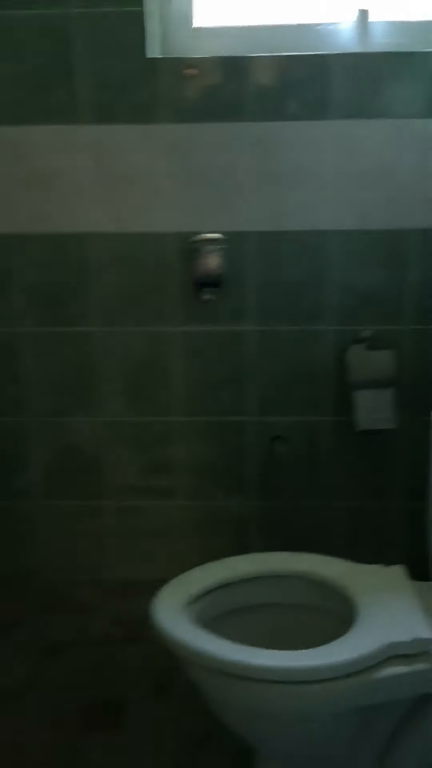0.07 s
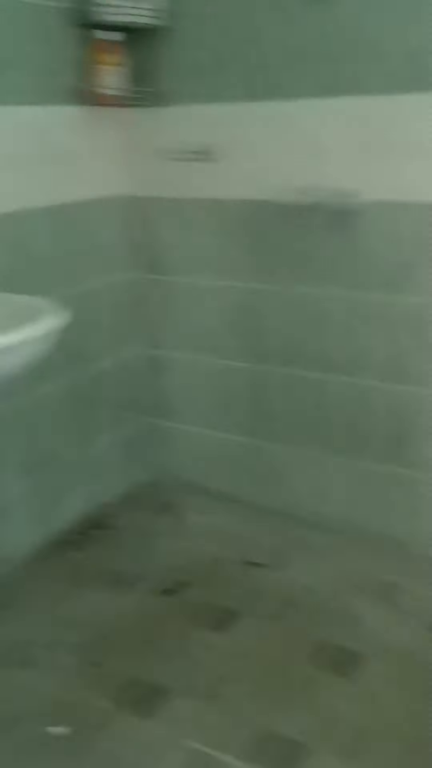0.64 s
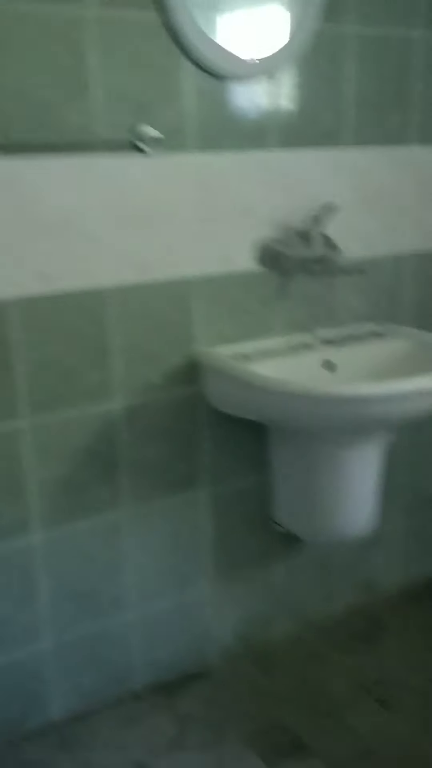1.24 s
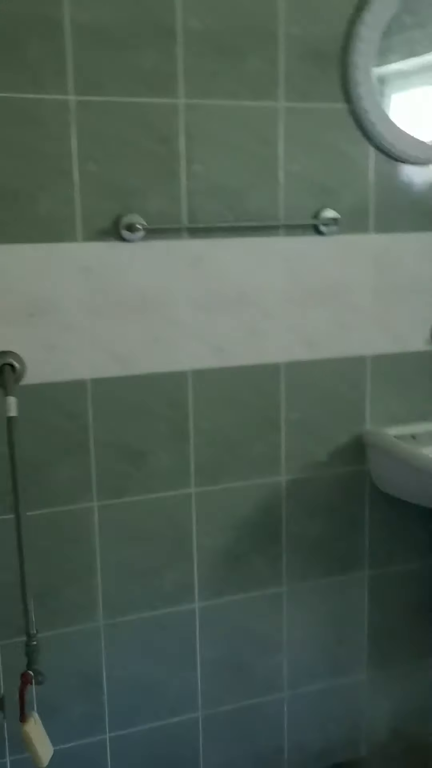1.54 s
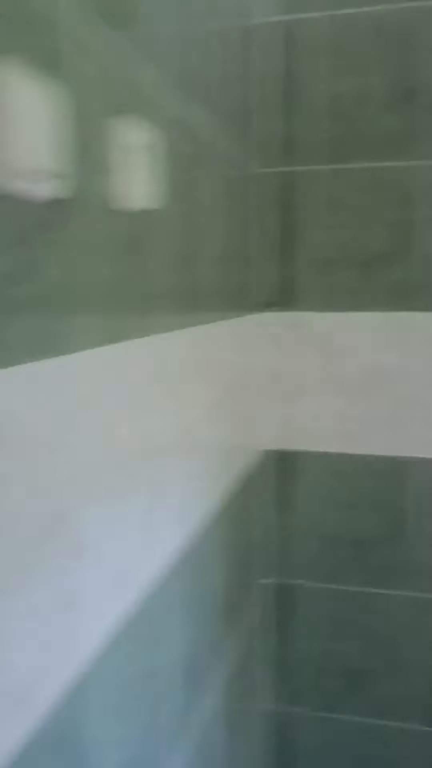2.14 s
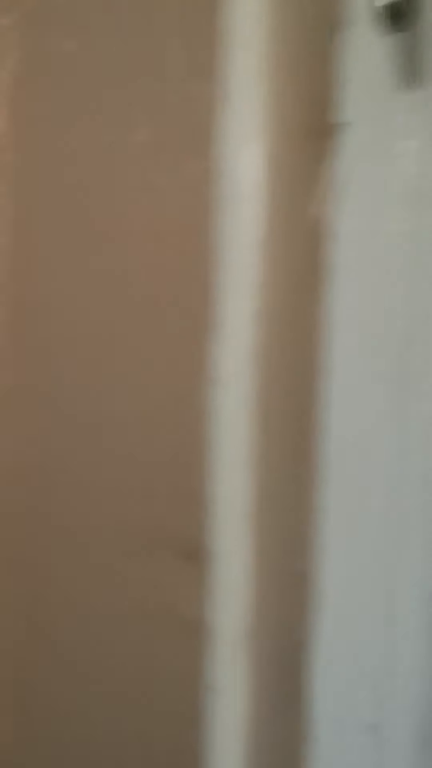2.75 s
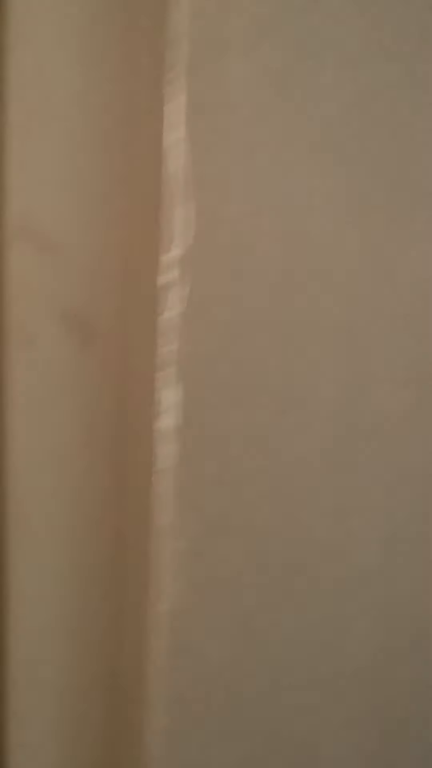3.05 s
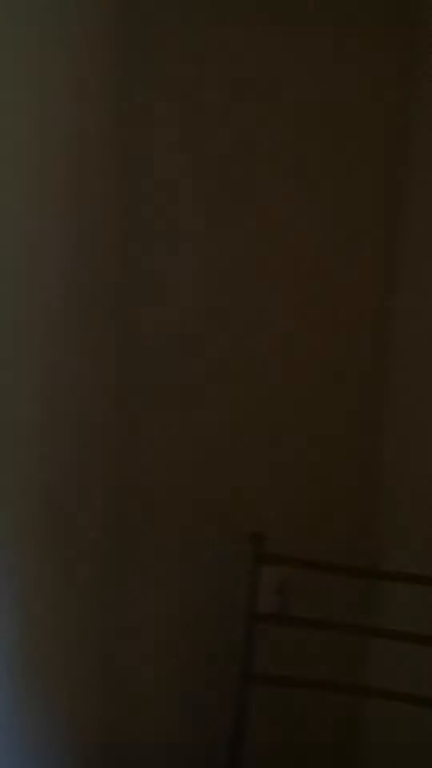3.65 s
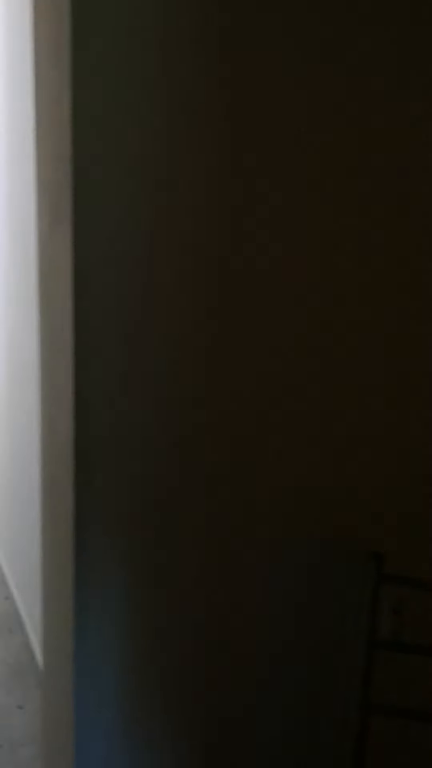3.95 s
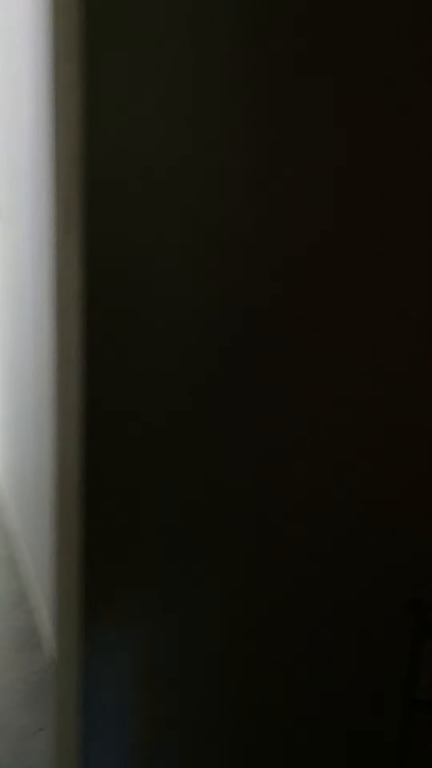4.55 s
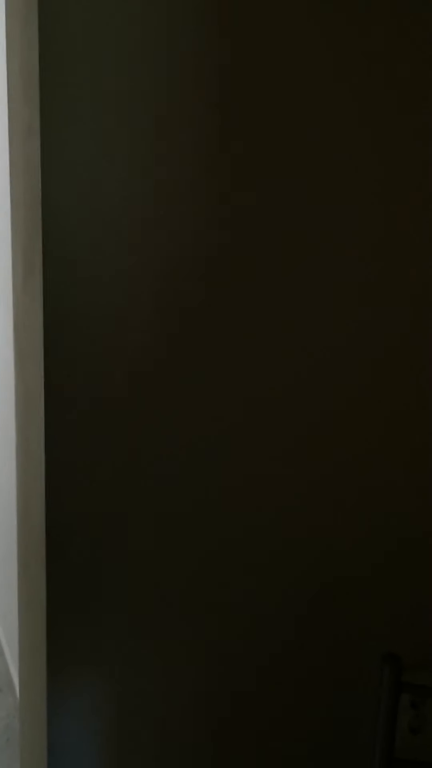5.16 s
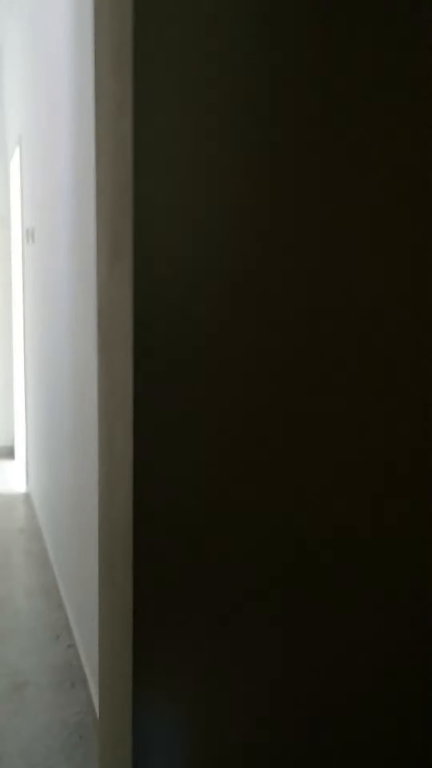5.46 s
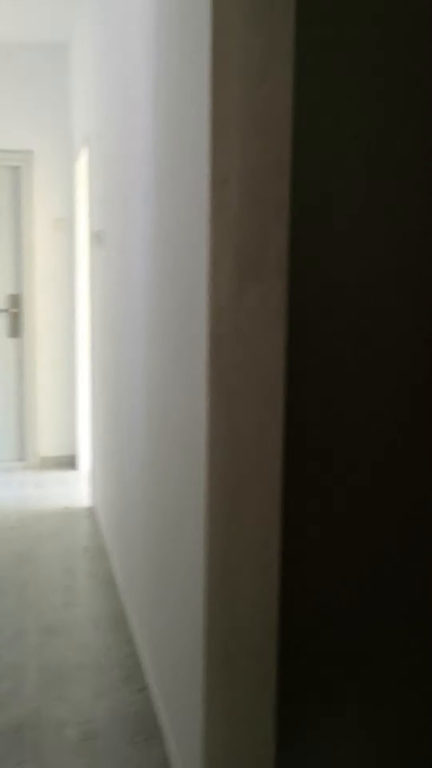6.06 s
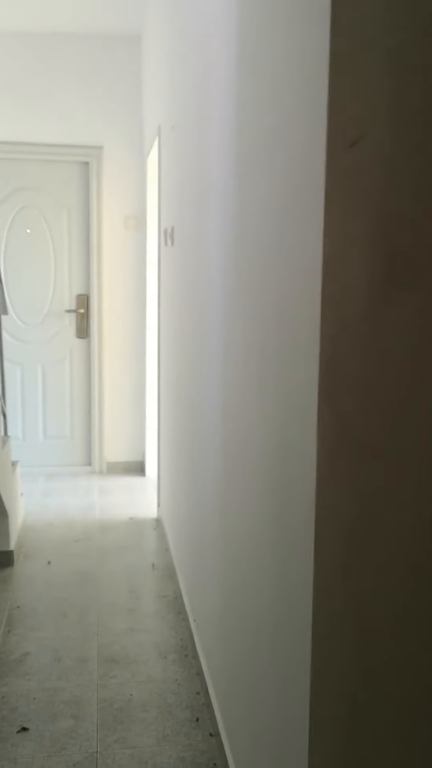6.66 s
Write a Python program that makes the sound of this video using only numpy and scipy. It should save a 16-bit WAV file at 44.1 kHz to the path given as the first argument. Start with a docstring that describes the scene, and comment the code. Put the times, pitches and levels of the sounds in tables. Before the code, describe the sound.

Shoes scuff, scrape and step unevenly over dusty tiles, with a bright echo from bare walls and a faint hush of air.

```python
"""Shuffling footsteps, close to a stereo microphone that the walker carries out of a tiled washroom
and into the corridor of an empty building. Soles grind dust and grit on the tiles, heels and toes
knock, and the weight of each step sets the rooms booming. The bare walls give a bright, dense echo,
distant rooms answer faintly, and behind it all lies the hush of still air."""
import sys
import numpy as np
from scipy import signal
from scipy.fft import rfft, irfft, next_fast_len
from scipy.io import wavfile
from scipy.ndimage import uniform_filter1d

SR = 44100
rng = np.random.default_rng(int(sys.argv[2]) if len(sys.argv) > 2 else 0)


def inscribe(sig):
    """Save sig as 16-bit PCM at rate SR to the path in sys.argv[1].

    A 1-D sig is mono; a 2-D sig holds one channel per row.
    Samples are clipped to [-1, 1] before scaling.
    """
    pcm = np.round(np.clip(np.atleast_2d(sig).T, -1, 1) * 32767)
    wavfile.write(sys.argv[1], SR, pcm.astype(np.int16))


N = 300746

# Still air in the building. Each row: frequency in Hz, relative level in dB.
AIR_SPECTRUM = [(20, 5.5), (45, -2.5), (100, -12), (150, -13.5), (300, -20), (550, -26), (1000, -25.5),
                (2000, -22), (4000, -31), (7500, -31.5), (11000, -40.5), (15000, -38)]
# Echo off the nearby walls. Each row: frequency in Hz, t60 in seconds.
WALL_DECAY = [(100, 0.74), (260, 0.33), (700, 0.52), (1900, 0.47), (4800, 0.44), (8000, 0.35),
              (14000, 0.15)]
# Standing waves between the walls. Each row: pitch in Hz, gain near the washroom in dB,
# gain in the corridor in dB, t60 in seconds.
ROOM_MODES = [(68.9, 1.5, -35, 0.79), (114.7, -8, 3.5, 0.87), (141.4, 0.5, 1, 0.17),
              (185, -3.5, -0.5, 0.79), (204, -6, -2.5, 1), (287, -9.5, -5.5, 1), (388, 0, -1, 0.49)]
# How alike the microphone's two ports hear a room. Each row: frequency in Hz, correlation.
PORT_LIKENESS = [(60, 0.98), (140, 0.92), (290, 0.42), (600, -0.8), (1200, 0.15), (15000, -0.11)]
# The right port hears more of the treble. Each row: frequency in Hz, right minus left in dB.
PORT_BALANCE = [(300, 0), (700, 2), (1400, 1.5), (2200, 1.5), (3200, -1), (5500, 2), (7500, -5),
                (9800, 9.5), (15000, -0.5)]
# The microphone turns against the walls. Each row: time in seconds, right minus left in dB.
MIC_TURN = [(0.351, 2.5), (.75, 0.5), (1.65, 3.5), (2.2, 0.5), (3, 1.5), (4.1, 2.2), (4.55, 2),
            (5.402, 3.5), (6.6, 2)]
# Weight shifts onto a foot. Each row: start in seconds, level in dB, pitch in Hz, t60 in seconds.
WEIGHT_SHIFTS = [(.7, -34.5, 103, 0.088), (1.484, -44, 130, 0.34), (1.847, -35.5, 186, 0.21),
                 (2.149, -35, 115, 0.054), (3.041, -53, 134, 0.22), (4.011, -53.5, 174, .25),
                 (4.089, -36, 118, .09), (4.28, -50.5, 207, .16), (4.385, -49.5, 175, 0.05),
                 (4.548, -59, 173, 0.33), (5.259, -39.5, 141, 0.31), (5.322, -29.5, 140, 0.46),
                 (5.475, -35, 144, .2), (6.386, -58.5, 252, 0.2), (6.539, -44, 211, 0.39)]
# Heel, toe or sole edge knocks, and the sharp cracks of grit grains under a landing sole (the two rows near 0.7
# s). Each row: start in seconds, level in dB, pitch in Hz, width in octaves.
SHOE_KNOCKS = [(.701, -31.5, 4160, 1), (.7124, -29, 5700, 0.67), (1.661, -31.5, 1960, 0.36),
               (1.739, -32, 1970, 3.1), (1.844, -27.5, 374, 0.47), (1.85, -33.5, 1010, 1.32),
               (2.138, -36.5, 1890, 0.85), (2.56, -53, 280, 1.1), (3.029, -42, 3600, 0.42),
               (3.472, -50.5, 1560, 0.52), (4.05, -37, 2980, 0.31), (4.089, -33, 680, 3.06),
               (4.096, -36, 2150, 0.35), (4.402, -50.5, 290, .5), (4.547, -29.5, 2730, 0.27),
               (5.262, -40, 1240, 0.81), (5.487, -39.5, 840, 0.96), (6.385, -45.5, 800, 0.58),
               (6.538, -31.5, 1650, 0.67), (6.54, -35.5, 431, 1.03), (6.578, -33.5, 1450, 0.82),
               (6.661, -40, 1620, 0.63)]
# The rasp of grit under a sole. Each row: frequency in Hz, relative level in dB.
GRIT_SPECTRUM = [(100, -9), (300, -25), (550, -27.5), (950, -15.5), (1300, -14.5), (1900, -4), (2500, -2),
                 (4000, -6), (5600, -1), (7500, 0.5), (9200, -4), (11500, -16.5), (15000, -17)]
# A sole is set down on grit. Each row: start in seconds, contact in seconds, level in dB,
# brightness in dB per octave.
SOLE_LANDINGS = [(0.0, 0.0014, -59.5, -12.5), (.254, 0.032, -43.5, -0.1), (0.696, 0.014, -35, -1),
                 (1.346, 0.011, -62.5, 7), (1.468, 0.058, -41, -2.5), (2.136, 0.031, -28.5, -1.5),
                 (2.769, 0.016, -44, 0.5), (3, 0.029, -50.5, -4), (3.379, 0.0035, -65, -12),
                 (3.471, .007, -59, -3), (3.707, 0.043, -56, .5), (4.01, 0.006, -47.5, 2),
                 (4.546, 0.0021, -34.5, -0.1), (5.136, 0.011, -60.5, -7), (5.257, 0.0061, -42.5, -2.5),
                 (5.482, 0.017, -41, 2), (5.72, 0.024, -58, -1.5), (6.382, 0.012, -43.5, 2)]
# A sole drags or twists over grit. Each row: start in seconds, length in seconds, level in dB,
# brightness in dB per octave.
SOLE_DRAGS = [(0.282, 0.1, -38.5, -1.5), (0.756, 0.039, -47, -2), (1.457, 0.21, -34.5, -4),
              (1.629, .12, -33.5, -2), (1.751, 0.13, -45, -3.5), (1.918, 0.062, -37, -0.5),
              (4.013, 0.057, -37.5, 1.4), (4.25, 0.12, -53, -5), (4.33, .042, -38.5, 6.5),
              (5.735, 0.3, -72, -8.5), (6.083, 0.18, -70, -19), (6.525, 0.18, -49.5, 3.5)]


def amp(db):
    """Decibels to gain."""
    return 10 ** (np.asarray(db) / 20)


def unit_rms(x):
    """Scales to rms 1."""
    return x / np.sqrt(np.mean(x ** 2) + 1e-20)


def curve_at(points, hz):
    """Reads a spectrum along a log-frequency axis."""
    freqs, values = np.transpose(points)
    return np.interp(np.log(hz + 1), np.log(freqs), values)


def add(mix, start_s, sound):
    """Lays a sound into the mix."""
    part = mix[max(round(start_s * SR), 0):][:len(sound)]
    part += sound[:len(part)]


def colour(x, db_at, size=4096):
    """Minimum-phase filter with the gain db_at(Hz)."""
    hz = abs(np.fft.fftfreq(size, 1 / SR))
    log_gain = np.log(amp(np.maximum(db_at(hz), -90)))
    taps = np.fft.ifft(np.exp(np.conj(signal.hilbert(log_gain)))).real
    return signal.fftconvolve(x, taps[:size // 2])[:len(x)]


def resonance_db(hz, centre_hz, octaves):
    """A broad hump with steep skirts."""
    return -32 * np.log10(1 + (np.log2((hz + 1) / centre_hz) / octaves) ** 2)


def stroke(swell_s, t60, slide_s=0):
    """Pressure that builds up, holds while the sole slides, and dies away."""
    t = np.arange(int((swell_s + slide_s + t60) * SR) + 2048) / SR
    rise = np.minimum(t / max(swell_s, 1 / SR), 1)
    return rise * amp(-60 * np.maximum(t - swell_s - slide_s, 0) / t60)


def at_level(sound, pressure, db):
    """Gives a sound the energy of its stroke, scaled by db."""
    return amp(db) * sound * np.linalg.norm(pressure) / np.linalg.norm(sound)


def impact(pressure, spike, centre_hz, octaves):
    """A sharp first contact and a noisy chatter ring one broad resonance."""
    chatter = pressure * rng.standard_normal(2 * SR)[:len(pressure)]
    chatter[0] += spike
    return colour(chatter, lambda hz: resonance_db(hz, centre_hz, octaves))


def at_ports(pair):
    """Two unrelated signals become alike in the bass, as at two close microphone ports."""
    first, second = rfft(pair)
    likeness = curve_at(PORT_LIKENESS, np.fft.rfftfreq(pair.shape[1], 1 / SR))
    mid = first * np.sqrt((1 + likeness) / 2)
    side = second * np.sqrt((1 - likeness) / 2)
    return irfft(np.array([mid + side, mid - side]), pair.shape[1])


def still_air(level_db=-63, drift_db=-1.2):
    """Room tone of the empty building: faint, slowly drifting rumble and hiss."""
    n = next_fast_len(N, True)
    spectrum = amp(curve_at(AIR_SPECTRUM, np.fft.rfftfreq(n, 1 / SR)))
    air = irfft(rfft(rng.standard_normal((2, n))) * spectrum, n)
    drift = unit_rms(uniform_filter1d(rng.standard_normal(N), size=16000))
    return amp(level_db) * unit_rms(at_ports(air)[:, :N]) * amp(drift_db * drift)


def wall_echo(x, gap_s=0.0025, far_db=-20.0, far_stretch=2.47):
    """Dense reflections, each band dying at its own speed; distant rooms ring fainter and longer."""
    reflections = rng.choice([-1., 1.], (2, SR)) * (rng.random((2, SR)) < 0.08)
    reflections *= np.arange(SR) / SR > gap_s
    hz, t, bands = signal.stft(at_ports(reflections), SR, nperseg=256)
    fall_db = -60 * t / curve_at(WALL_DECAY, hz)[:, None]
    near, far = amp(fall_db), amp(far_db + fall_db / far_stretch)
    tail = signal.istft(bands * np.hypot(near, far), SR, nperseg=256)[1]
    return signal.fftconvolve(x[None], tail / np.linalg.norm(tail[0]), axes=1)[:, :N]


def moving_echo(x, patterns=4, crossfade_samples=380):
    """A moving shoe meets another pattern of echoes every few milliseconds."""
    place = np.arange(N) / crossfade_samples
    offsets = [(place - k + patterns / 2) % patterns - patterns / 2 for k in range(patterns)]
    return sum(wall_echo(x * np.cos(np.pi / 2 * np.clip(offset, -1, 1))) for offset in offsets)


def direct_path(x, lag_samples=25):
    """The straight path from the shoe reaches the right port first."""
    return np.array([np.pad(x, (lag_samples, 0))[:N], x])


def treads(ball_after_s=0.1, ball_db=-9.5, swell_share=0.047):
    """Every footfall presses twice: the heel, then more softly the ball of the foot."""
    for start_s, db, centre_hz, t60 in WEIGHT_SHIFTS:
        pressure = stroke(swell_share * t60, t60)
        yield start_s, pressure, db, centre_hz
        yield start_s + ball_after_s, pressure, db + ball_db, centre_hz


def room_boom(corridor_from_s=4.9, reach_octaves=0.79, detune=0.011, stride=10):
    """The energy of each footfall piles up in the standing waves near its pitch and leaks away."""
    rate = SR // stride  # deep waves need few samples
    t, out = np.arange(rate) / rate, np.zeros(N)
    for start_s, pressure, db, centre_hz in treads():
        power = np.pad(pressure ** 2, (0, SR))[::stride][:rate]
        ring = np.zeros(rate)
        for hz, washroom_db, corridor_db, t60 in ROOM_MODES:
            mode_db = washroom_db if start_s < corridor_from_s else corridor_db
            retained = amp(-120 / (t60 * rate))  # share of the energy left after one sample
            height = np.sqrt(signal.lfilter([1 - retained], [1, -retained], power))
            pitch_hz = hz * (1 + detune * rng.uniform(-0.86, 1))
            wave = np.sin(2 * np.pi * (pitch_hz * t + rng.random()))
            ring += amp(db + mode_db + resonance_db(hz, centre_hz, reach_octaves)) * height * wave
        add(out, start_s, signal.resample_poly(ring, stride, 1))
    return out


def floor_thuds():
    """A dull push on the floor below the microphone, then a rumble as the foot rolls."""
    out = np.zeros(N)
    for start_s, pressure, db, centre_hz in treads():
        thud = impact(pressure, spike=25.4, centre_hz=centre_hz, octaves=0.9)
        add(out, start_s, at_level(thud, pressure, db))
    return out


def shoe_knocks():
    """The part of the shoe that strikes the tiles rings briefly; a few grains of grit crack sharply the same
    way."""
    out = np.zeros(N)
    for start_s, db, centre_hz, octaves in SHOE_KNOCKS:
        t60 = 0.06 * (1000 / centre_hz) ** 0.18 / octaves ** 0.15  # higher and wider knocks die sooner
        pressure = stroke(0, t60)
        knock = impact(pressure, spike=5.0, centre_hz=centre_hz, octaves=octaves)
        add(out, start_s, at_level(knock, pressure, db))
    return out


def sole_rubs():
    """A landing sole bites fast and settles; a dragged one swells and lifts off."""
    for start_s, span_s, db, tilt in SOLE_LANDINGS:
        yield start_s, stroke(swell_s=0.44 * span_s, t60=0.32, slide_s=0.56 * span_s), db, tilt
    for start_s, span_s, db, tilt in SOLE_DRAGS:
        yield start_s, stroke(swell_s=0.83 * span_s, t60=1.45 * span_s, slide_s=0.17 * span_s), db, tilt


def grit_scuffs(grains_per_s=1800, spread_db=2.5, dust_gain=0.38, catch_db=4.0):
    """Grains of grit crack over a fine hiss of dust, while the sole catches and slides."""
    grains = amp(spread_db * np.minimum(rng.exponential(1, N), 4)) * rng.choice([-1, 1], N)
    cracks = unit_rms(grains * (rng.random(N) < grains_per_s / SR))
    catch = amp(catch_db * unit_rms(uniform_filter1d(rng.standard_normal(N), size=300)))
    friction = (cracks + dust_gain * rng.standard_normal(N)) * catch
    out = np.zeros(N)
    for start_s, pressure, db, tilt in sole_rubs():
        rub = pressure * np.roll(friction, -round(start_s * SR))[:len(pressure)]
        rasp = colour(rub, lambda hz: curve_at(GRIT_SPECTRUM, hz)
                      + tilt * np.log2(np.maximum(hz, 700) / 4000))
        # the lighter the contact, the higher its lowest pitch
        lowest_hz = min(523 * 2 ** (0.23 * (-45.5 - db)), SR / 10)
        rasp = signal.lfilter(*signal.butter(2, lowest_hz, "high", fs=SR), rasp)
        add(out, start_s, at_level(rasp, pressure, db))
    return out


def scene():
    """Shoes heard from carrying height in the echoing rooms, over still air."""
    contacts = grit_scuffs() + shoe_knocks()
    thuds = floor_thuds()
    shoes = amp(-2.0) * moving_echo(contacts) + amp(-7.5) * direct_path(contacts)
    lean_db = np.interp(np.arange(N) / SR, *np.transpose(MIC_TURN)) / 2
    bass = amp(-5.5) * wall_echo(thuds) + amp(-11.0) * thuds + amp(-2.0) * room_boom()
    return shoes * amp([-lean_db, lean_db]) + bass + still_air()


def record(dry, edge_hz=15400):
    """Each microphone port has its own colour, and the highest treble is cut off."""
    n = next_fast_len(N, True)
    lean_db = curve_at(PORT_BALANCE, np.fft.rfftfreq(n, 1 / SR)) / 2
    heard = irfft(rfft(dry, n) * amp([-lean_db, lean_db]), n)[:, :N]
    lowpass = signal.firwin(511, edge_hz, window=("kaiser", 9), fs=SR)
    return signal.oaconvolve(heard, lowpass[None], "same")


dry = scene()
out = record(dry)
inscribe(out)
```